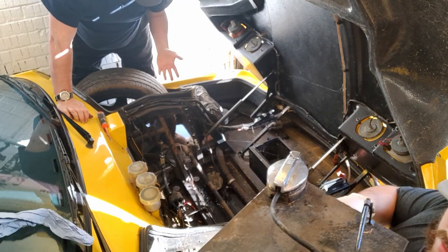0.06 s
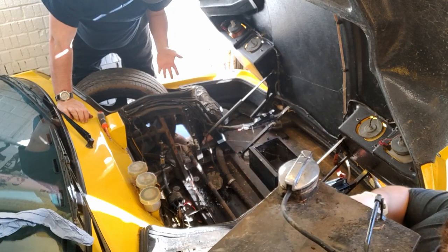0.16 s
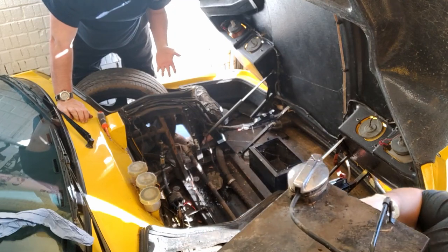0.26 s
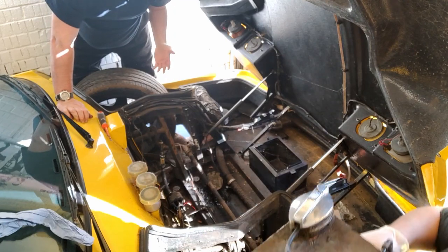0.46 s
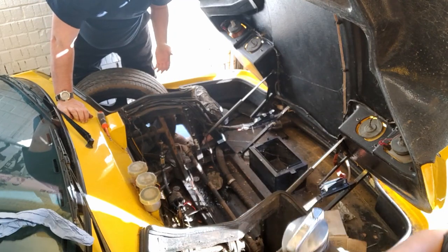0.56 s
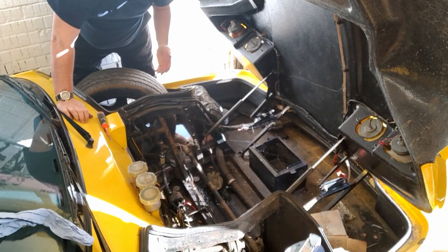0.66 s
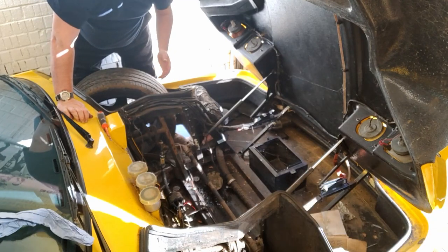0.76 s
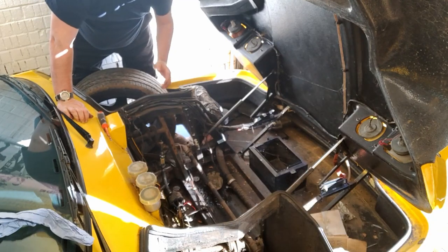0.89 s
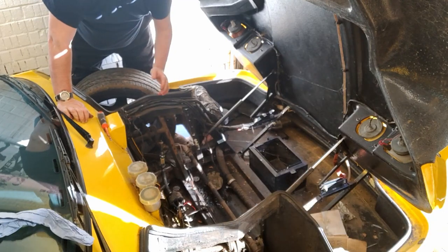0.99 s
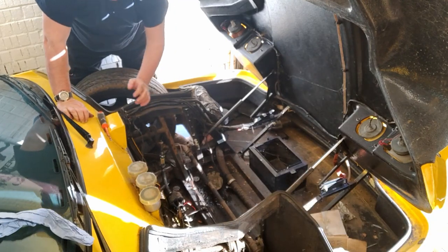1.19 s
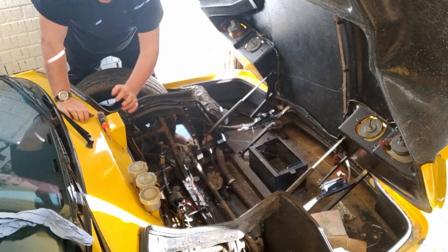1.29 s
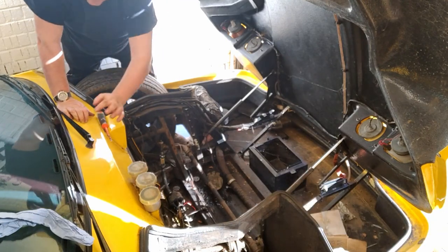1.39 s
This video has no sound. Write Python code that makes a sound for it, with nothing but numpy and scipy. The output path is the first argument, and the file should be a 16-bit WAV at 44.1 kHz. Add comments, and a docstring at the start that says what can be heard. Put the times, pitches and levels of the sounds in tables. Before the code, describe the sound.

A metal tank clunks loudly, then bumps and scrapes as it is lifted from a car.

```python
"""In a garage, a steel fuel tank is lifted out of a car's front compartment.
It catches on the bodywork with a loud rattling clunk, bumps once more and scrapes on its way out.
Each knock makes the tank's sheet metal ring and its hollow inside thud. Rubbing steel squeaks,
sharp edges hiss, small fittings tick, and the garage answers with a short echo."""
import sys
import numpy as np
from scipy import signal
from scipy.fft import rfft, irfft, next_fast_len
from scipy.io import wavfile
from scipy.ndimage import map_coordinates

SR = 44100
rng = np.random.default_rng(int(sys.argv[2]) if len(sys.argv) > 2 else 0)


def wav_record(signal):
    """Record a signal, one row per channel, as 16-bit PCM in the file named by sys.argv[1]."""
    frames = np.transpose(np.atleast_2d(signal))
    bounded = np.clip(frames, -1, 1)
    # unit amplitude maps onto the largest positive 16-bit level
    quanta = np.round(bounded * 32767).astype(np.int16)
    wavfile.write(sys.argv[1], SR, quanta)


N = 63945

# tone colour of rattling sheet metal: f/Hz, relative level/dB
CLATTER_COLOUR = [(150, -22.5), (450, -33), (720, -7), (900, 1), (1150, -2), (1300, -4.5), (1500, -3),
                  (2300, 1), (3000, -1.5), (4000, -0.5), (4500, -9), (5200, -19.5), (7000, -21),
                  (16000, -48)]


def amp(db):
    """Turn decibels into a number to multiply by."""
    return 10 ** (np.asarray(db) / 20)


def unit(x):
    """Scale a sound to an average strength (rms) of 1."""
    return x / np.sqrt(np.mean(x ** 2) + 1e-20)


def along(points, hz):
    """Read between (frequency, value) points, with octaves evenly spaced."""
    freqs, values = np.transpose(points)
    return np.interp(np.log(hz + 1), np.log(freqs + 1), values)


def filtered(x, response):
    """Multiply each frequency in a sound by response(hz)."""
    size = next_fast_len(len(x) + 8192)
    return irfft(rfft(x, size) * response(np.fft.rfftfreq(size, 1 / SR)), size)[:len(x)]


def noise(colour, size, limit_hz=SR):
    """Noise of strength 1 with a given tone colour, falling steeply above a limit."""
    white = rng.standard_normal(size)
    return unit(filtered(white, lambda hz: amp(along(colour, hz)) / np.sqrt(1 + (hz / limit_hz) ** 12)))


def fade(t, t60, rise_s=0.0004):
    """Rise, then die away; t60 is the fade time, the seconds it takes to drop 60 dB."""
    return (1 - np.exp(-t / rise_s)) * amp(-60 * t / t60)


def add(track, start_s, sound):
    """Mix a sound into a track at a given time."""
    part = track[max(round(start_s * SR), 0):][:len(sound)]
    part += sound[:len(part)]


def ring(hz, t60, db, t):
    """A struck object's fading tones, a little different in strength at every blow."""
    gains = amp(db + rng.normal(0, 1, len(hz))) * (-1) ** np.arange(len(hz))
    tones = np.sin(2 * np.pi * hz[:, None] * t)
    return gains @ (tones * fade(t, np.reshape(t60, (-1, 1)), rise_s=0.0011))


def tank_ring(place, t, t60=0.17, gain_db=-8.5):
    """Where the tank is touched decides how strongly each of its tones rings."""
    # the tank's tones: f/Hz, then relative level/dB for each kind of contact
    tones = [(340.9, -18.5, -35, -1, -3.5), (600.5, -9.5, -24, -13, -7), (896, -6.5, -7.5, -1, 2),
             (1118.6, -14.5, -3.5, -9, -11.5), (1191, -29, 3, -5, -9.5), (1409.3, -6.5, -5.5, 4, -9),
             (1488.3, 1.5, -8, -4, -9.5), (1713, -17, -8, -30, -8), (1763, -12.5, -3.5, -26, -6),
             (1995, -12, -5.5, -19, -28), (2170, -5.5, -18, -8.5, -20), (2570, -2.5, -7.5, -12, -13),
             (2995, -5.5, -11, -24, -28), (3240, -15, -8, -32, -9), (3425, -16.5, -6, -10, -6.5),
             (3890, -7, -19, -32, -17)]
    # kinds of contact, in column order: corner, side, base, rubbed
    places = ["corner", "side", "base", "rubbed"]
    hz, *levels = np.transpose(tones)
    return ring(hz, t60, levels[places.index(place)] + gain_db, t)


def scrape(grit_per_s=380, grit_db=2, ring_db=-8):
    """Gritty rubbing makes the sliding tank sing and its panels drone."""
    # course of the slide: t/s, rubbing level/dB, drone level/dB
    slide = [(0, -49, -55.5), (.05, -57, -57.5), (.135, -50, -56), (.168, -59, -65.5), (.21, -45.5, -42.5),
             (.232, -36.5, -47), (0.292, -25.5, -34), (.40, -47, -43), (.45, -54.5, -54),
             (.55, -58.5, -57.5), (.61, -56.5, -56), (.655, -55.5, -66), (.69, -43.5, -50),
             (.765, -45.5, -35), (.805, -59.5, -58.5), (.838, -49, -61), (.865, -62, -78),
             (0.941, -53, -51), (0.976, -48.5, -46.5), (1.04, -56.5, -53), (1.11, -51.5, -57.5),
             (1.15, -51.5, -47.5), (1.24, -62, -58), (1.295, -58, -58.5), (1.349, -71, -64),
             (1.401, -62.5, -53.5), (1.45, -62.5, -56.5)]
    # tone colours of the rubbing and the drone: f/Hz, relative level/dB
    rub_colour = [(100, -64), (400, 8), (750, -5.5), (1100, 7.5), (1400, -3.5), (1750, 2), (2100, 3),
                  (3500, 3), (4300, -4), (5300, -27), (7000, -17.5), (10000, -20.5), (13000, -9.5),
                  (16000, -28)]
    drone_colour = [(40, -17), (80, -5.5), (170, -5), (320, 0), (450, -6), (560, -3), (720, -12.5),
                    (1500, -13), (4000, -45)]
    t = np.arange(N) / SR
    times, rub_db, drone_db = np.transpose(slide)
    grit = map_coordinates(rng.standard_normal(N), [t * grit_per_s])  # a smooth random wobble
    rub = unit(noise(rub_colour, N) * amp(grit_db * grit))
    singing = unit(signal.fftconvolve(rub, tank_ring("rubbed", t[:SR // 4]))[:N])
    drone = amp(np.interp(t, times, drone_db)) * noise(drone_colour, N)
    return amp(np.interp(t, times, rub_db)) * (rub + amp(ring_db) * singing) + drone


def room_air(level_db=-60):
    """The room's faint, steady rumble and hiss."""
    # tone colour of the air: f/Hz, relative level/dB
    colour = [(20, -7), (50, 1.5), (72, 9), (120, -1.5), (170, -16), (350, -4.5), (700, -35), (2000, -16),
              (4000, -18), (5300, -38.5), (13000, -31), (16000, -44)]
    return amp(level_db) * noise(colour, N)


def squeaks():
    """Steel sticks and slips, sounding one narrow band of pitch for a moment."""
    # squeaks: middle t/s, length/s, f/Hz, width/Hz, level/dB
    slips = [(.005, 0.076, 2810, 252, -51), (0.219, 0.059, 1665, 160, -42.5), (.62, 0.028, 3520, 150, -55),
             (1.146, 0.053, 529, 68, -51.5), (1.417, 0.11, 1780, 350, -59.5)]
    out, t = np.zeros(N), np.arange(N) / SR
    for middle_s, length_s, centre_hz, width_hz, db in slips:
        white = rng.standard_normal(N)
        tone = unit(filtered(white, lambda hz: 1 / (1 + (2 * (hz - centre_hz) / width_hz) ** 2)))
        out += amp(db) * tone * np.exp(-(2 * (t - middle_s) / length_s) ** 2)
    return out


def garage_echo(sound, level_db=-21.5, delay_s=0.012):
    """The garage sends every sound back as a short, blurred echo."""
    # how long the echo lasts: f/Hz, fade time/s
    fade_times = [(100, 0.32), (1000, .42), (4000, 0.31), (14000, 0.39)]
    hz, t, bands = signal.stft(rng.standard_normal(SR // 2), SR, nperseg=256)
    tail = signal.istft(bands * amp(-60 * t / along(fade_times, hz)[:, None]), SR)[1]
    out = np.zeros(N)
    add(out, delay_s, signal.fftconvolve(sound, tail / np.linalg.norm(tail)))
    return amp(level_db) * out


def scratches():
    """Sharp edges skid briefly with a thin hiss."""
    # skids: t/s, level/dB, fade time/s
    skids = [(0.179, -51, 0.093), (0.637, -63, .2), (0.892, -61.5, 0.28), (.962, -55, 0.38)]
    # tone colour of the hiss: f/Hz, relative level/dB
    colour = [(5000, -37), (7000, -11), (8800, 1.5), (10500, -4.5), (13000, 2), (16000, -12.5)]
    out, t = np.zeros(N), np.arange(SR // 3) / SR
    for start_s, db, t60 in skids:
        add(out, start_s, amp(db) * noise(colour, len(t)) * fade(t, t60, rise_s=0.0027))
    return out


def knocks(crack_db=-8):
    """The tank hits the bodywork: its metal clatters, rings and ticks, and its hollow thuds."""
    # blows: t/s, clatter/dB, thud/dB, tick/dB, ring/dB, clatter's treble limit/Hz, place struck
    blows = [(0.2324, -30, -18, -44, -51, 3560, "corner"), (.2370, -12, -26, -33.5, -10.5, 3350, "corner"),
             (0.2462, -19, -25, -33, -29, 4150, "corner"), (.2520, -15.5, -23, -32.5, -15, 5600, "corner"),
             (0.2634, -15.5, -28, -26, -19, 4650, "corner"), (0.2694, -15, -32, -19, -23.5, 5100, "corner"),
             (.2750, -13.5, -17.5, -37, -17.5, 5050, "corner"),
             (0.296, -43, -22.5, -48, -17.5, 4200, "corner"), (.3080, -22.5, -22, -57, -21, 4200, "corner"),
             (.3308, -12.5, -37, -29.5, -13, 4400, "side"), (.3355, -19, -58, -51, -29, 4160, "side"),
             (0.3514, -20, -33, -35.5, -15.5, 4760, "side"), (0.36, -20, -34, -55, -17, 3600, "side"),
             (.3860, -21, -37.5, -50, -29, 3330, "side"), (0.397, -29.5, -44, -66, -41, 3200, "side"),
             (.5800, -47.5, -47.5, -60, -54, 2980, "side"), (.5960, -49, -46, -77, -45, 3360, "side"),
             (0.6642, -37.5, -46.5, -47.5, -33.5, 4460, "side"), (0.679, -43, -64, -58, -40, 3560, "side"),
             (0.7033, -27, -32.5, -48.5, -27.5, 2780, "base"), (0.7178, -29, -31, -53, -21.5, 3160, "base"),
             (0.7331, -27.5, -59, -36.5, -67, 4070, "base"), (0.7372, -24.5, -31, -70, -48, 4070, "base"),
             (0.7504, -37.5, -49, -61, -40, 3820, "base"), (.7670, -35.5, -34, -52, -78, 4150, "base")]
    # low tones of the hollow: f/Hz, relative level/dB, fade time/s
    hollow = [(224, -8, .18), (268.7, -6.5, 0.128), (284, -22.5, 0.5)]
    # tone colours of the thud and the hard tick: f/Hz, relative level/dB
    thud_colour = [(30, -43), (80, -21), (130, -7), (180, -19), (230, -4), (350, 4.5), (450, -4.5),
                   (580, 3), (720, -9), (1100, -4.5), (3000, -65)]
    tick_colour = [(500, -33), (3500, -9), (5500, -6.5), (8000, -7), (10500, -1), (13000, 4), (14500, 5),
                   (16000, -21)]
    out, t = np.zeros(N), np.arange(SR // 2) / SR
    low_hz, low_db, low_t60 = np.transpose(hollow)
    crack_shape = amp(crack_db) * fade(t, t60=0.0093)  # the first instant of contact
    clatter_shape = crack_shape + fade(t, t60=0.091)
    for start_s, clatter_db, thud_db, tick_db, ring_db, limit_hz, place in blows:
        clatter = amp(clatter_db) * noise(CLATTER_COLOUR, len(t), limit_hz) * clatter_shape
        thud = noise(thud_colour, len(t)) * fade(t, t60=0.063, rise_s=0.0018)
        if place != "base":  # blows on the base thud without the low ring
            thud += ring(low_hz, low_t60, low_db, t)
        tick = amp(tick_db) * noise(tick_colour, len(t)) * fade(t, t60=0.043)
        ringing = amp(ring_db) * tank_ring(place, t)
        add(out, start_s, clatter + ringing + amp(thud_db) * thud + tick)
    return out


def panel_boom(start_s=0.238):
    """The clunk sets a big panel swinging: a deep tone swells and dies away."""
    # the panel's tone: f/Hz, level/dB, rise time/s, fade time/s
    panel = (115, -29, .05, .4)
    hz, db, rise_s, t60 = panel
    out, t = np.zeros(N), np.arange(SR) / SR
    add(out, start_s, amp(db) * np.sin(2 * np.pi * hz * t) * fade(t, t60, rise_s))
    return out


def fittings():
    """Small metal parts tick and lightly rattle the sheet metal."""
    # taps: t/s, tick level/dB, sheet metal level/dB
    taps = [(0.433, -51, -38), (0.4371, -45.5, -46), (0.9495, -36.5, -39), (0.953, -30, -39),
            (0.959, -37, -41.5), (1.148, -50, -62), (1.1525, -45, -52)]
    # tone colour of a fitting's tick: f/Hz, relative level/dB
    colour = [(2000, -32), (4000, -14), (6000, -40), (9000, -5), (11000, 4.5), (13000, 12), (15000, -4),
              (16000, -11)]
    out, t = np.zeros(N), np.arange(SR // 4) / SR
    for start_s, tick_db, sheet_db in taps:
        tick = amp(tick_db) * noise(colour, len(t)) * fade(t, t60=0.018)
        rattle = amp(sheet_db) * noise(CLATTER_COLOUR, len(t)) * fade(t, t60=0.031)
        add(out, start_s, tick + rattle)
    return out


def scene():
    """The tank's sounds, their echo and the quiet air, in one channel."""
    tank = knocks() + panel_boom() + fittings() + scratches() + scrape() + squeaks()
    return (tank + garage_echo(tank) + room_air())[None]


def record(dry, low_cut_hz=59, top_hz=16300):
    """Thin the deep bass and remove the very highest treble."""
    bass_cut = signal.butter(2, low_cut_hz, "highpass", fs=SR, output="sos")
    thinned = signal.sosfilt(bass_cut, dry[0])
    return filtered(thinned, lambda hz: hz < top_hz)[None]


dry = scene()
out = record(dry)
wav_record(out)
```